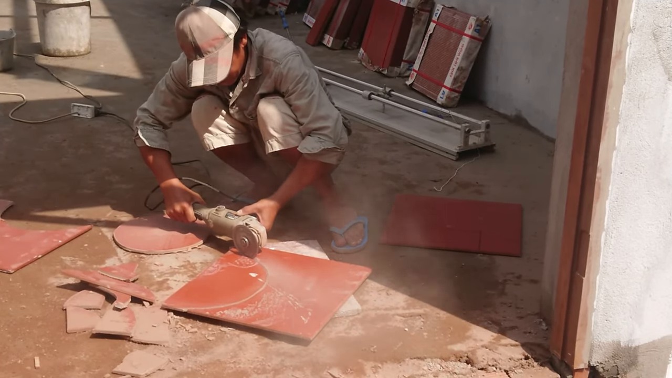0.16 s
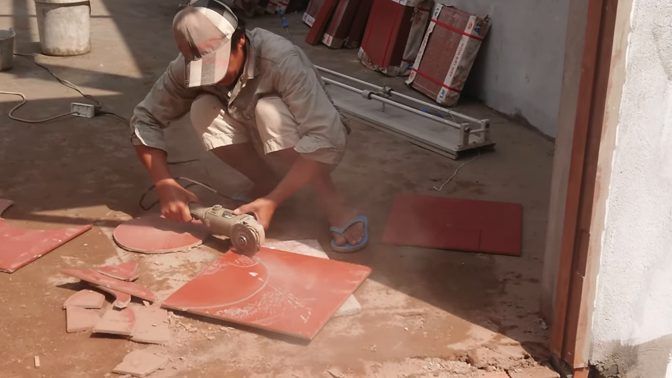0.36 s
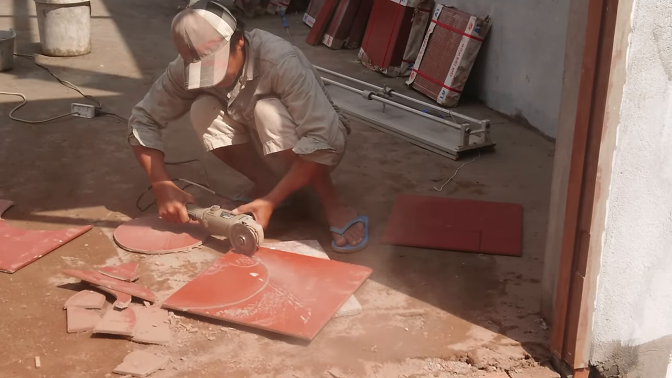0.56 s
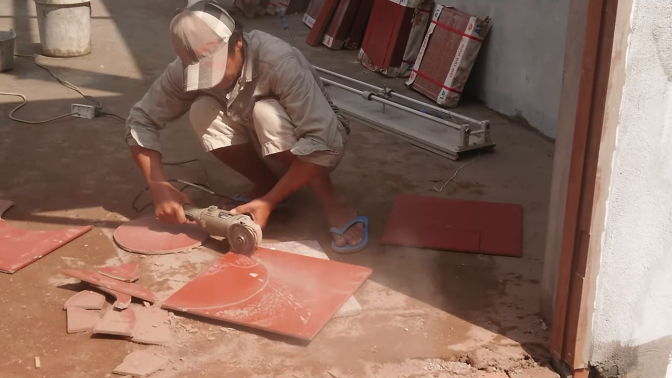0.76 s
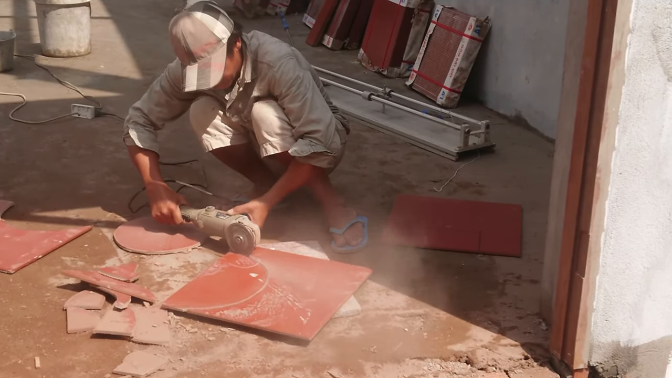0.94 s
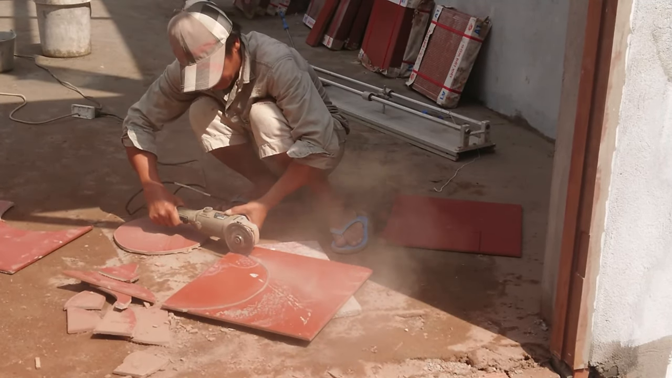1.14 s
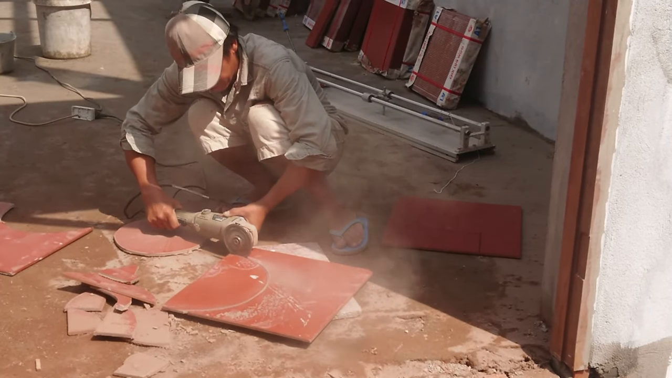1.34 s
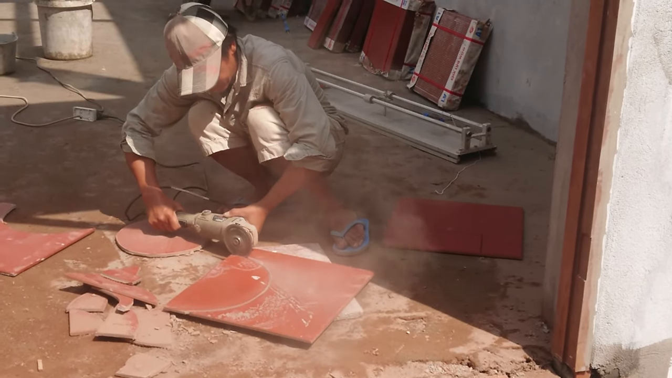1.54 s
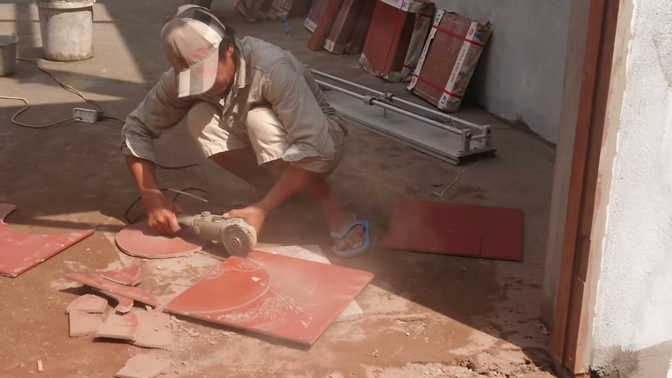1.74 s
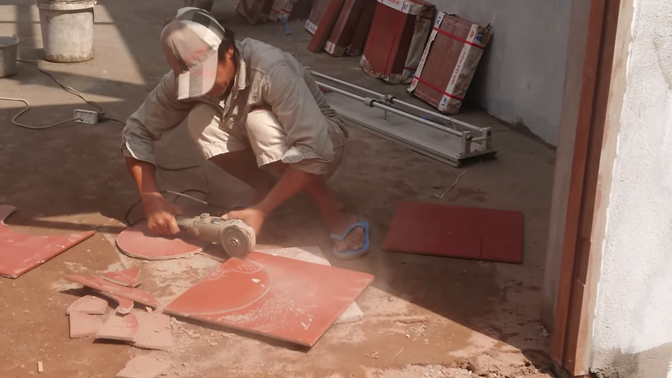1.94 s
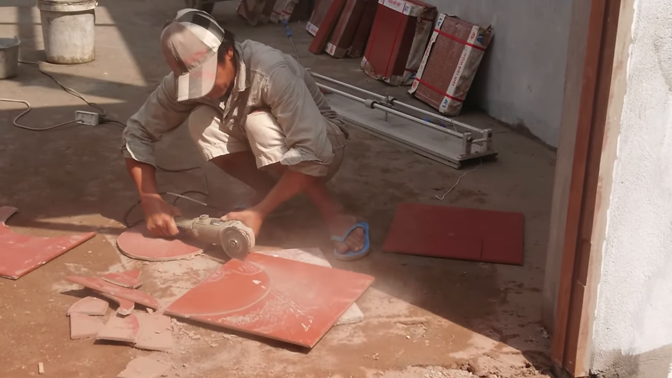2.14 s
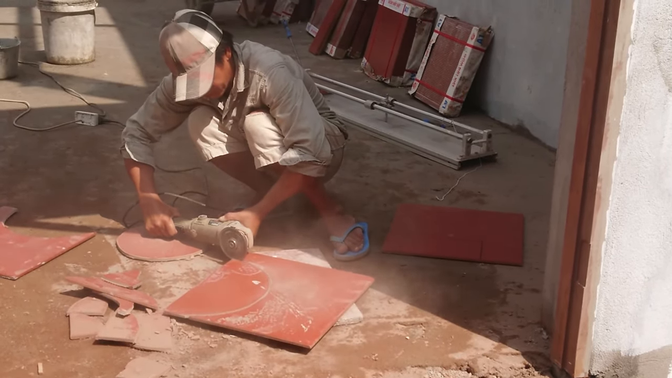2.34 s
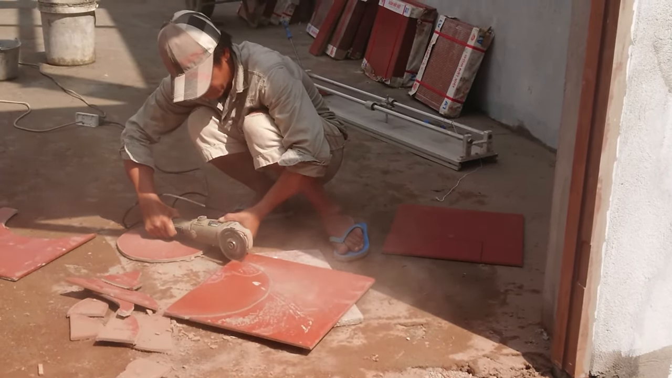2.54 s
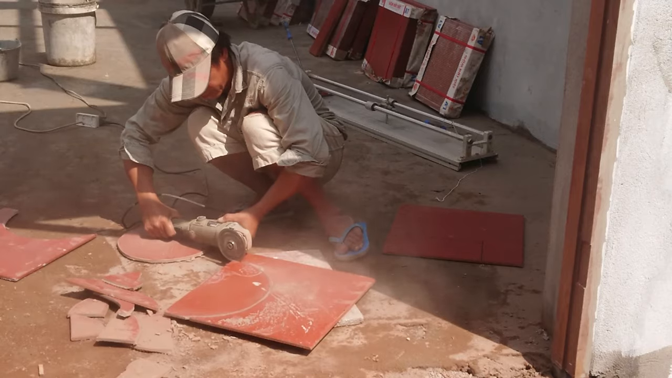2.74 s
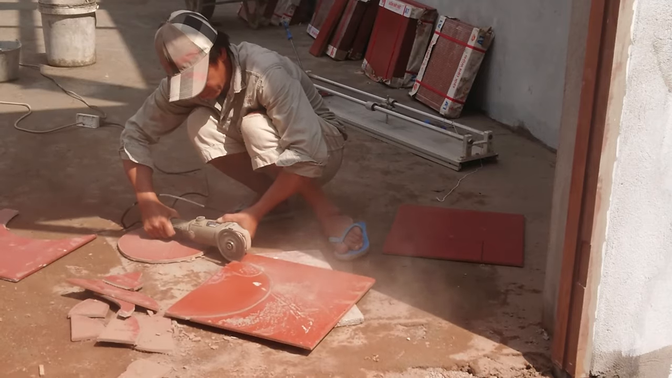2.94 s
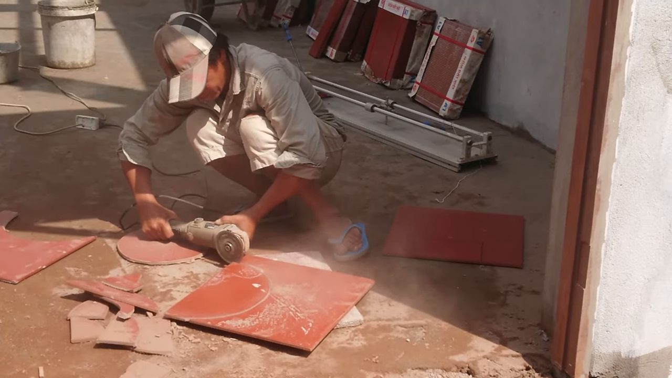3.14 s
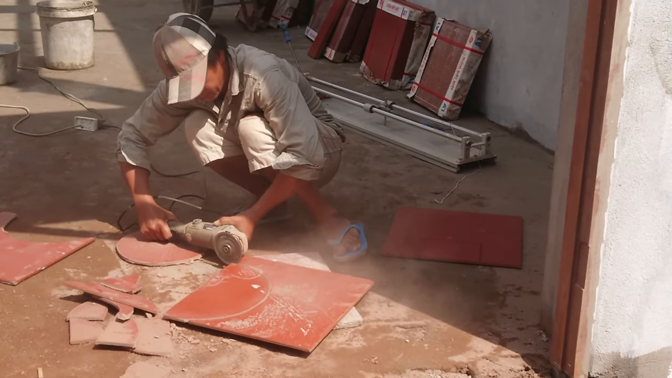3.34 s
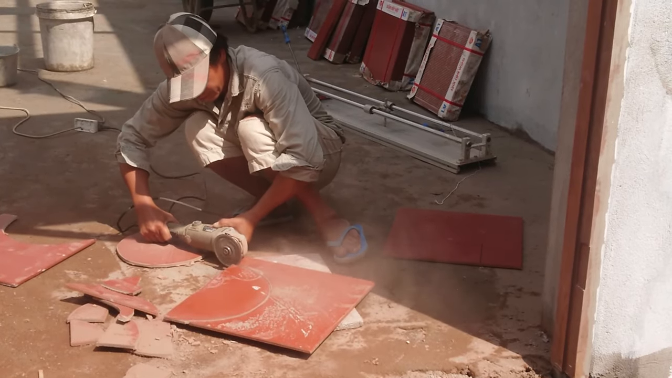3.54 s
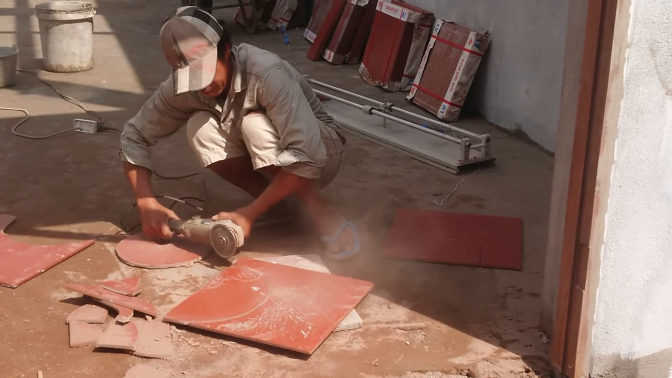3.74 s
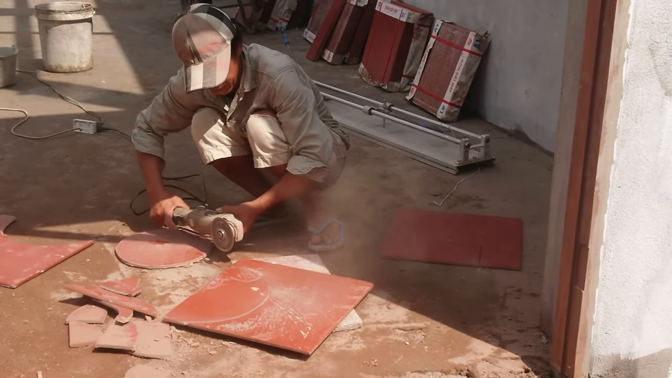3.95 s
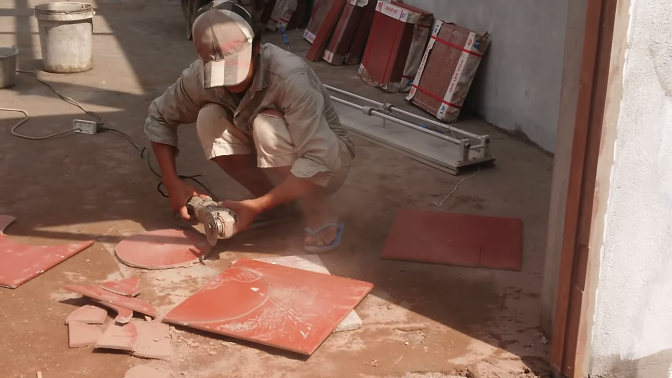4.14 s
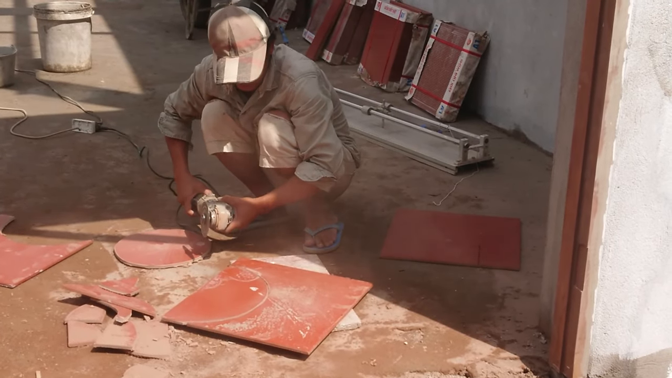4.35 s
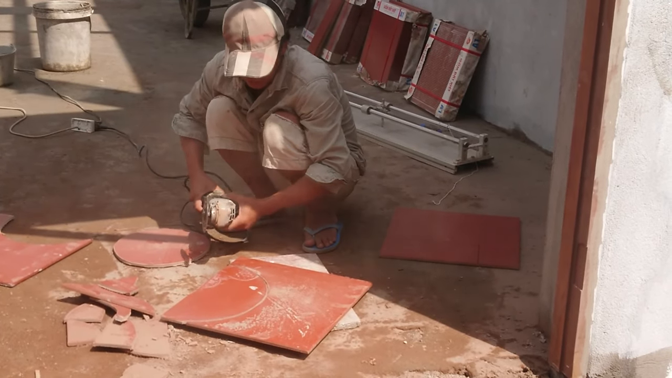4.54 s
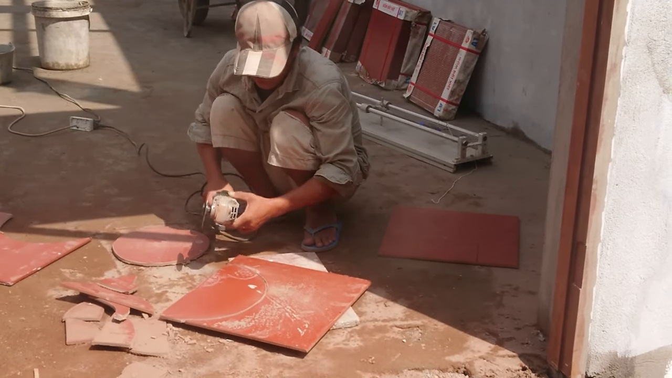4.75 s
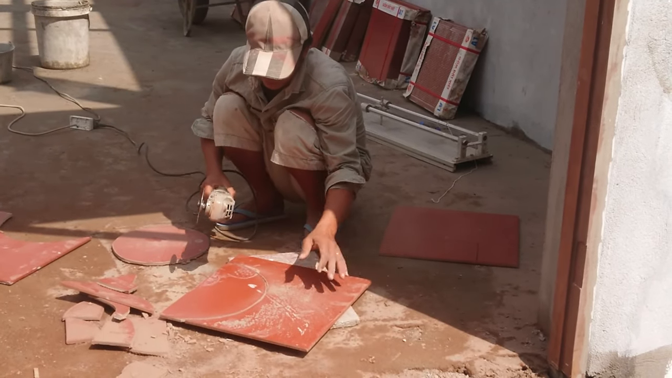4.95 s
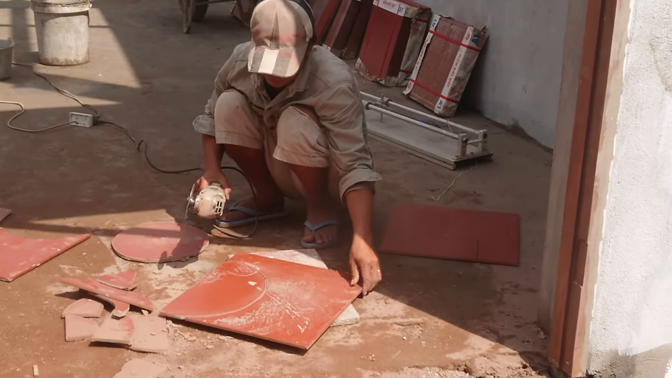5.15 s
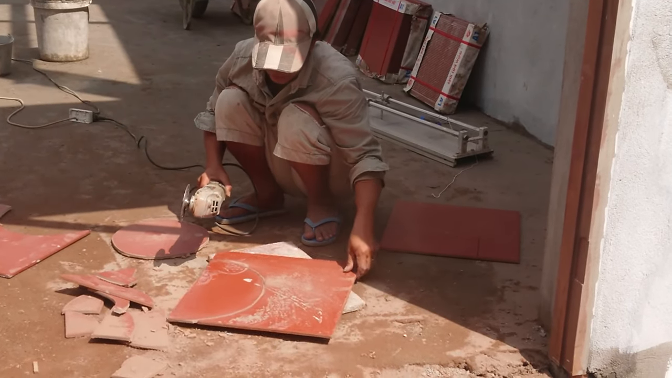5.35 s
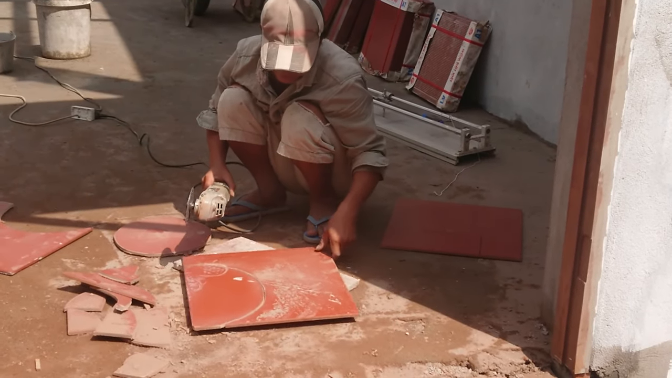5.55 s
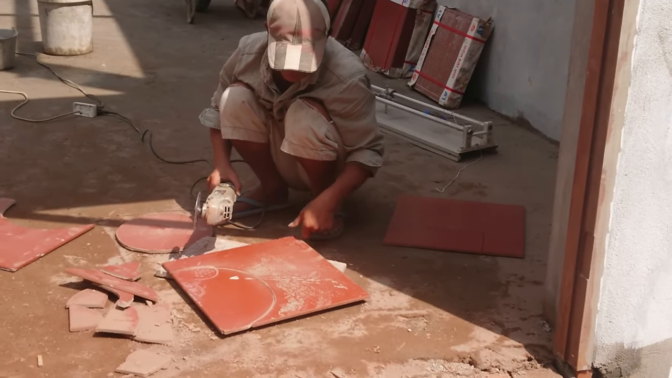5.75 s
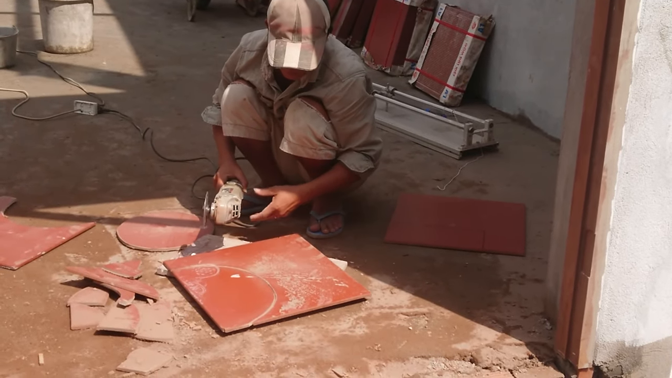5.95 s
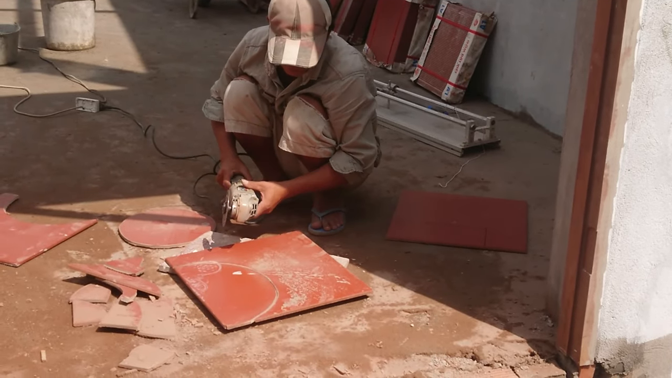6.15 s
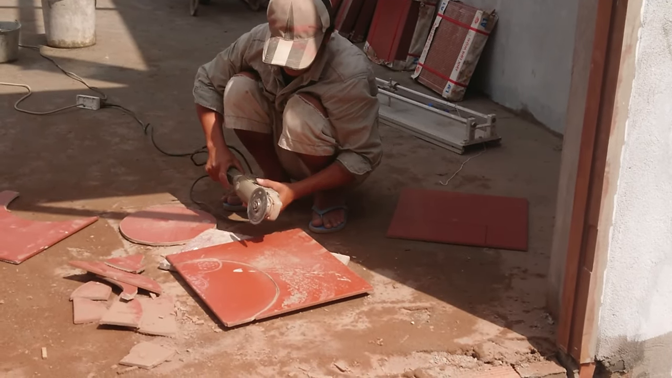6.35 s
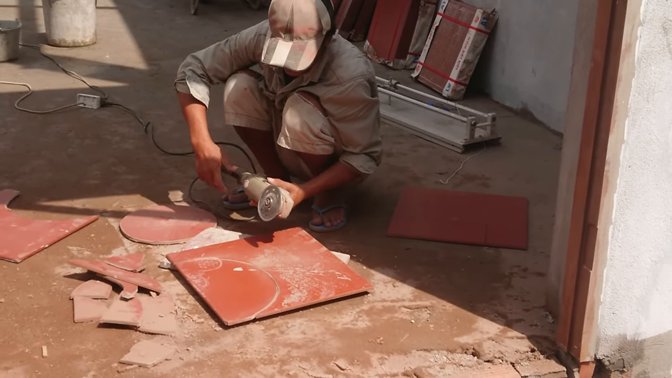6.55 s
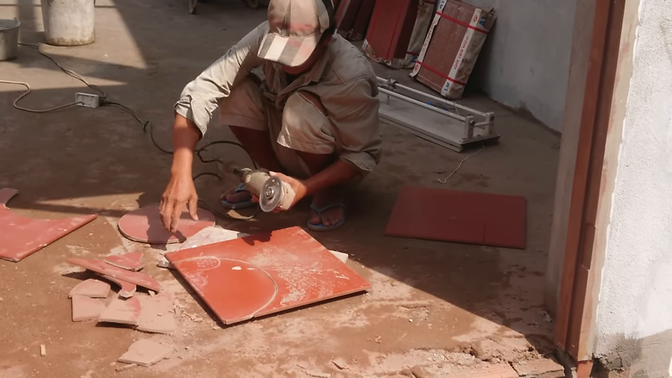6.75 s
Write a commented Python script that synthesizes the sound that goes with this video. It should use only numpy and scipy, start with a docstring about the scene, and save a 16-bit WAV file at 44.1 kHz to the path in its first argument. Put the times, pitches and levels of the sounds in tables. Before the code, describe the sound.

From the start, an angle grinder cuts a hard floor tile close by, making a loud, gritty, bright rasp with wavering, ringing tones. Its pitch sags slightly around 1 second, then climbs as the cut deepens, loudest between 2 and 3 seconds. At about 3.8 seconds the disc lifts away and the switch clicks sharply. The high motor whine glides steadily downward over a hissing rush of air, fading through the remaining three seconds. A soft, low outdoor rumble rises from about 4.5 seconds. Between 5.3 and 6 seconds the loose tile is turned on the floor, scraping and giving several short knocks, the strongest near 5.5. The slowing gears rattle faintly from then until the end, near 7 seconds, with a few thin metal ticks between 6 and 6.6. The sound is stereo, with short echoes off nearby walls.

```python
"""An angle grinder cuts a floor tile under a roof: the disc strikes once a turn and sheds grit, both ring tile
and disc, and the motor whines at a fixed multiple of the disc speed. Near 3.8 s the tool is lifted, the switch
clicks, and the whine glides down over a rush of air as the low rumble beneath grows louder. From 5.3 s the
slack gear rattles and the tile is turned, scraping and knocking; thin metal ticks come last. Two microphone
ports hear it all in unlike colours."""
import sys
import numpy as np
from scipy import signal
from scipy.fft import rfft, irfft, next_fast_len
from scipy.io import wavfile
from scipy.ndimage import uniform_filter1d

SR = 44100
rng = np.random.default_rng(int(sys.argv[2]) if len(sys.argv) > 2 else 0)


def store_wav(level_fs):
    """Save 16-bit WAV to argv[1]."""
    pcm = np.round(np.clip(np.atleast_2d(level_fs), -1, 1) * 32767)
    wavfile.write(sys.argv[1], SR, pcm.T.astype(np.int16))


N = 304290
T = np.arange(N) / SR

# The cut's moves, ending at the lift:
# (time [s], pressure [dB], treble lift [dB], weight of regular strikes [0-1], cut depth [0-1])
CUT_MOVES = [(0, -18.5, 6.5, 0.5, 0.15), (.23, -17.5, 3, 0.14, 0.2), (.62, -17.5, 7, 0.36, 0.46),
             (1, -17.5, 4.5, 0.46, 0.49), (2.16, -15, 2, 0.04, 0.83), (2.55, -15.5, 3.5, 0.41, 0.85),
             (3, -15, 3, 0.43, 0.88), (3.3, -18, 4.5, 0.4, 0.89), (3.67, -20, 8, 0.38, 0.81),
             (3.75, -29.5, 15.5, 1, .6), (3.785, -29, 8, 0, 0.5)]
# Resonances of tile and disc: (pitch [Hz])
BODY_HZ = [620, 820, 1045, 1250, 1325, 1465, 1600, 1750, 2130, 2215, 2300, 2630, 2940, 3050, 3380, 3615,
           4000, 4393, 4772, 5400, 6600, 7210, 8020, 9000, 10480, 11350, 13230, 13800, 15200]
# Shape of each resonance: (nominal width [Hz], level in a shallow cut [dB], in a deep cut [dB])
BODY_SHAPES = [(90, -33, -26), (74.5, -20.5, -23), (48, -23.5, -15.5), (49.4, -42, 3), (42, 3, -18),
               (45, -4.5, -33), (80, -36.5, -20), (109, -19, -10), (71.4, -8, 1), (65, -3, -6.5),
               (55, -9, -11), (75, -9, -5), (63, -3.5, -2), (96, -17.5, -1), (52, -33.5, -22), (38, -15, 0),
               (320, -8.5, -11.5), (40, -5.5, -3), (40, -16, 1), (48.6, -11.5, -9.5), (230, -9.5, -14),
               (72, -5, -19.5), (210, -7.5, -5), (345.6, -13.5, -11.5), (140, -18.5, -5.5), (110, -15, -16),
               (170, -4.5, -6), (360, -9, -9.5), (600, -12, -14)]
# Broad bed of grit under the resonances: (frequency [Hz], level [dB])
GRIT_EQ = [(30, -44), (150, -41), (500, -32), (1100, -22.5), (1400, -13.5), (2450, -16), (3200, -9.5),
           (5000, -16), (6000, -17.5), (6500, -11), (8500, -12), (11000, -19.5), (12600, -28), (14500, -17),
           (15300, -17), (15800, -19)]


def cut():
    """Strikes once a turn and gritty noise ring tile and disc; the colour shifts as the cut deepens."""
    pressure_db, _, regular, _ = columns(CUT_MOVES, T)
    turn = disc_turns()
    offsets = rng.random((40, 1)) + 0.14 * drift(3.886, count=40, t=T[::256])  # no two strikes alike
    strikes = sum(np.cos(2 * np.pi * (k * turn + np.interp(T, T[::256], offset)))
                  for k, offset in enumerate(offsets, 1))
    chatter_db = 0.86 * smooth_noise(samples=350) + 0.25 * np.cos(2 * np.pi * turn)
    grit = unit_rms(gritty_noise(spike_db=4.27))
    drive = (0.62 * regular * unit_rms(strikes) + np.sqrt(1 - regular ** 2) * grit) * gain_of(chatter_db)

    def body(hz, s):
        _, treble_db, _, depth = columns(CUT_MOVES, s)
        wander_db = 1.8 * drift(25, count=len(BODY_HZ), t=s)
        power = gain_of(2 * columns(GRIT_EQ, hz, log=True)[0])
        for mode_hz, (width, shallow_db, deep_db), wander in zip(BODY_HZ, BODY_SHAPES, wander_db):
            db = shallow_db + (deep_db - shallow_db) * depth + wander
            power = power + gain_of(2 * db) / (1 + (2 * (hz - mode_hz) / width) ** 2) ** 1.47
        return np.sqrt(power) * gain_of(treble_db * np.clip((hz - 5000) / 7000, 0, 1))
    lift_fade = np.clip((CUT_MOVES[-1][0] - T) / .012, 0, 1)
    return gain_of(pressure_db) * lift_fade * unit_rms(coloured(drive, body, size=2048))


# Sharp modes that sing in the cut: (pitch [Hz])
SING_HZ = [322, 612, 810, 985, 1060, 1245, 1325, 1470, 1560, 1720, 2130, 2205, 2300, 2635, 2940, 3050, 3122,
           3612, 3945, 4393, 4772, 8030]
# Each sharp mode at full pressure: (width [Hz], early level [dB], midway level [dB], late level [dB])
SING_SHAPES = [(11.2, -68, -63, -63.5), (37.2, -55, -55, -51), (40.3, -33, -49, -51.5),
               (19.2, -65, -63, -54), (83.333, -52.5, -55.5, -55), (54, -41, -41.5, -45),
               (42.5, -28, -42.5, -46.5), (44.7, -32.5, -52, -62), (74.074, -40, -43, -51),
               (63, -56, -46, -31.5), (34.4, -47, -40, -36.5), (32.407, -36, -32, -67),
               (18.519, -54, -44, -38), (40, -52, -49, -50), (27, -34, -47, -50), (31.8, -52, -33, -26),
               (20, -64, -50, -40), (50, -85, -48, -28), (25, -67, -58, -43), (25, -45, -37, -40),
               (25, -52, -41, -42), (40, -32, -44, -36)]
# Early, midway and late keyframes: (time [s])
SING_KEYFRAMES = [.7, 1.9, 3]


def singing():
    """Wavering harmonics of the disc speed, each swelling while it sits on a sharp mode."""
    full_pressure_db, bite = -17, 2.2  # the singing follows the pressure, more than in step
    turn, disc_hz, t = disc_turns(), disc_speed()[::64], T[::64]
    bite_db = bite * (columns(CUT_MOVES, t)[0] - full_pressure_db)
    bite_db[t >= CUT_MOVES[-1][0]] = -np.inf
    power = np.array([gain_of(2 * (np.interp(t, SING_KEYFRAMES, db) + bite_db))
                      for _, *db in SING_SHAPES])
    mode_hz, width = np.c_[SING_HZ], np.array(SING_SHAPES)[:, :1]
    out = np.zeros(N)
    for k, waver in enumerate(drift(25, count=55, t=t), 1):
        detuning = 2 * (k * disc_hz - mode_hz) / width
        level = np.sqrt((power / (1 + detuning ** 4)).sum(0)) * gain_of(2 * waver)
        out += np.interp(T, t, level) * np.sin(2 * np.pi * k * turn + 0.45 * np.interp(T, t, waver))
    return np.sqrt(2) * out


# The disc sagging under load, ending at switch-off: (time [s], speed [turns/s])
POWERED_SPEED = [(0, 154.7), (.3, 151), (.6, 147.2), (1, 146.5), (1.2, 147.2), (1.65, 152.4), (2.5, 159.6),
                 (2.75, 163), (3.05, 164.5), (3.6, 163.9), (3.79, 166.2)]


def disc_speed():
    """Turns per second: the motor pulls, then bearing friction and fan drag wind the disc down."""
    friction, fan_drag = 21.35, .002398  # slowing [Hz/s] = friction + fan_drag * speed ** 2
    off_s, off_hz = POWERED_SPEED[-1]
    even_hz = np.sqrt(friction / fan_drag)  # friction and drag are equal here
    run_down = np.sqrt(friction * fan_drag) * np.maximum(T - off_s, 0)
    coast = even_hz * np.tan(np.arctan(off_hz / even_hz) - run_down)
    return np.where(T < off_s, columns(POWERED_SPEED, T)[0], coast)


def disc_turns():
    """Turns so far: the clock for everything that spins."""
    return np.cumsum(disc_speed()) / SR


# How housing and floor colour the whine: (frequency [Hz], level [dB])
WHINE_EQ = [(2700, -66), (3200, -58), (3400, -53), (3800, -46), (3990, -46), (4250, -41), (4680, -37),
            (4850, -40), (5140, -37), (5680, -47), (6040, -35), (6600, -21), (7110, -35), (7450, -24),
            (7830, -33), (8100, -26), (8400, -36), (8720, -25), (9150, -34), (9400, -28), (10300, -28),
            (11400, -32), (12900, -38), (13800, -24), (15700, -30)]


def whine():
    """The commutator bars sing a tone and its octave, which sweep down as the disc coasts."""
    bars_per_turn = 55.6
    disc_hz, turn = disc_speed(), disc_turns()
    loaded_db = -35 - 3 * np.maximum(155 - disc_hz, 0)  # sinks as the speed sags
    coast_db, octave_db = (columns(WHINE_EQ, k * bars_per_turn * disc_hz, log=True)[0] for k in (1, 2))
    crossfade = np.clip((T - POWERED_SPEED[-1][0]) / 0.098, 0, 1)
    tone_db = loaded_db + crossfade * (coast_db - loaded_db)
    octave_db = octave_db - 14 - 1.6 * np.maximum(64 - disc_hz, 0)  # dies below 64 turns/s
    phase = 2 * np.pi * bars_per_turn * turn
    flutter = gain_of(1.5 * np.cos(2 * np.pi * turn) + 2.2 * drift(40, count=1, t=T)[0])
    tones = gain_of(tone_db) * np.sin(phase) + gain_of(octave_db) * np.sin(2 * phase)
    return np.sqrt(2) * flutter * tones


# Fader ride of cooling air and gears: (time [s], level [dB], treble tilt [dB/octave])
AIR_MOVES = [(0, -44, -2.5), (3.7, -27, 1.5), (3.85, -25.5, -1), (4.4, -26.5, -2), (5, -31, -2),
             (5.7, -32.5, -3.5), (6.1, -42.5, -0.5), (6.9, -47.5, -0.5)]
# Colour of that rush: (frequency [Hz], level [dB])
AIR_EQ = [(300, -20), (700, -9), (1150, -7), (1450, 1.5), (1900, -7.5), (3000, 2.5), (5200, 5),
          (5800, -5.5), (6500, 12), (8000, 7), (10000, 2.5), (12300, -8), (13300, 1), (13900, 3),
          (14400, -3), (15800, 3)]


def air_rush():
    """Cooling air and gears make a bright noise that shimmers in random patches."""
    def colour(hz, s):
        patches = rng.standard_normal((len(hz), len(s)))
        patches = uniform_filter1d(uniform_filter1d(patches, 12, axis=0), 10, axis=1)
        tilt_db = columns(AIR_MOVES, s)[1] * np.log2((hz + 100) / 3000)
        return gain_of(columns(AIR_EQ, hz, log=True)[0] + tilt_db + 1.46 * unit_rms(patches))
    return gain_of(columns(AIR_MOVES, T)[0]) * unit_rms(coloured(rng.standard_normal(N), colour))


# Ride of the gear rattle: (time [s], level [dB], ring pitch [Hz])
RATTLE_MOVES = [(5.3, -54, 2140), (5.8, -42.5, 2150), (6, -42, 2120), (6.1, -49, 2070), (6.25, -42.5, 1960),
                (6.45, -54, 2000), (6.5, -73, 3200), (6.56, -44, 3050), (6.9, -54, 3120)]


def gear_rattle():
    """The slack gear knocks once a turn: a short rough ping, each with its own force."""
    turn = disc_turns()
    level_db, ring_hz = columns(RATTLE_MOVES, T)
    force = gain_of(2.4 * rng.standard_normal(2000))[turn.astype(int)]
    since_s = turn % 1 / disc_speed()
    roughness = 1 + .55 * smooth_noise(samples=60)
    pings = np.sin(2 * np.pi * ring_hz * since_s) * since_s * np.exp(-since_s / 0.0016)
    return gain_of(level_db) * unit_rms(force * roughness * pings)


def motor_hum():
    """A faint hum at twice the disc speed, gone below 140 turns per second."""
    level = gain_of(-64.5 + 2 * drift(6, count=1, t=T)[0])
    gate = np.clip((disc_speed() - 140) / 5, 0, 1)
    return np.sqrt(2) * level * gate * np.sin(4 * np.pi * disc_turns())


# Ring of the loose tile: (pitch [Hz], level [dB], t60 before damping [s])
TILE_MODES = [(580, 1, 0.099), (766, 7, .05), (1120, -7, .05), (1270, 18.5, 0.034), (1510, 12, 0.061),
              (1890, 8, 0.069), (2090, 15, 0.017), (2200, -6, .05), (2730, -2, 0.031), (4470, -14, .03)]
# The sliding tile catches: (time [s], level [dB], half-length [s])
TILE_SCUFFS = [(5.433, -35, 0.012), (5.507, -43, .015), (5.544, -36, 0.0066), (5.587, -45, 0.025),
               (5.696, -42, 0.013), (5.78, -32, 0.0087)]
# Its edge hits the floor: (time [s], peak [dB])
TILE_KNOCKS = [(5.416, -28), (5.4824, -31), (5.5429, -16), (5.5486, -19), (5.6373, -25), (5.6918, -24.5),
               (5.8292, -34)]


def turned_tile():
    """Grit scrapes under the loose tile and its edge knocks on the floor; both ring the same modes."""
    drag_from_s, drag_to_s, fade_s, drag_db = 5.3, 5.95, 0.14, -45.5
    t = np.arange(4000) / SR
    ring = sum(gain_of(db - 60 * t / t60) * np.sin(2 * np.pi * hz * t) for hz, db, t60 in TILE_MODES)
    slide_ring = np.diff(ring * np.exp(-t / 0.0014))  # the floor deadens the sliding tile
    knock_ring = ring * (1 - np.exp(-t / 0.00052)) * np.exp(-t / 0.005)
    drag = gain_of(drag_db) * np.clip(np.minimum(T - drag_from_s, drag_to_s - T) / fade_s, 0, 1)
    scuffs = sum(gain_of(db) * np.exp(-((T - s) / half_s) ** 2) for s, db, half_s in TILE_SCUFFS)
    out = (drag + scuffs) * unit_rms(signal.oaconvolve(gritty_noise(spike_db=4.2), slide_ring)[:N])
    for s, peak_db in TILE_KNOCKS:
        contact = np.diff(rng.standard_normal(41) * np.hanning(41))
        knock = signal.oaconvolve(contact, knock_ring)[:len(t)]
        out[round(s * SR):][:len(t)] += gain_of(peak_db) * knock / abs(knock).max()
    return out


# Cue for the switch: (time [s], peak [dB])
SWITCH_CUES = [(3.7665, -11)]


def switch_click():
    """The plastic switch snaps: a tiny burst of bright noise."""
    out, t = np.zeros(N), np.arange(300) / SR
    for s, peak_db in SWITCH_CUES:
        click = np.diff(rng.standard_normal(len(t) + 2), 2) * np.exp(-t / .001)
        out[round(s * SR):][:len(t)] += gain_of(peak_db) * click / abs(click).max()
    return out


# Thin ticks as the tool is handled: (time [s], peak [dB], pitch [Hz])
TICK_CUES = [(5.9752, -32, 10000), (6.0096, -28, 9830), (6.0425, -38, 8230), (6.1528, -37, 8310),
             (6.2445, -31, 9110), (6.3683, -35, 9990), (6.429, -23, 8950), (6.6367, -33, 8800)]


def metal_ticks():
    """Tiny metal parts touch and ring for a few milliseconds."""
    out, t = np.zeros(N), np.arange(800) / SR
    for s, peak_db, hz in TICK_CUES:
        out[round(s * SR):][:len(t)] += gain_of(peak_db) * np.sin(2 * np.pi * hz * t) * np.exp(-t / .0012)
    return out


# Fader ride of the outdoor bed, rising once the grinder is quiet: (time [s], level [dB])
RUMBLE_FADER = [(0, -68), (3.8, -55.5), (4.2, -55), (4.6, -46.5), (5.5, -43), (6.9, -42)]
# Its heavy lows and faint hiss: (frequency [Hz], level [dB])
RUMBLE_EQ = [(25, -40), (34, -30), (42, -3), (75, 4), (130, -4), (250, -8), (500, -7), (900, -5),
             (1200, -12.5), (2500, -6), (5400, -10), (6000, -27), (6500, -37), (8800, -8.5), (11000, -20.5),
             (13300, -16), (14500, -8.5), (15800, -19.5)]


def outdoor_rumble():
    """A stereo bed of low noise from outside, mostly alike on both sides."""
    def colour(hz, s):
        return gain_of(columns(RUMBLE_EQ, hz, log=True)[0])
    alike = 0.9
    common, *sides = rng.standard_normal((3, N))
    bed = [coloured(alike * common + np.sqrt(1 - alike ** 2) * side, colour, size=4096) for side in sides]
    return gain_of(columns(RUMBLE_FADER, T)[0]) * unit_rms(np.array(bed))


def wall_echoes(t60):
    """Reverb tail off the walls: sparse taps of random sign that die away, energy 1."""
    taps = np.zeros(SR // 2)
    at = np.arange(200, len(taps) - 20, 20)
    taps[at + rng.integers(0, 20, len(at))] = rng.choice([-1., 1.], len(at)) * gain_of(-60 * at / SR / t60)
    return taps / np.linalg.norm(taps)


def gain_of(db):
    """Decibels to gain."""
    return 10 ** (np.asarray(db) / 20)


def unit_rms(x):
    """Scales to rms 1."""
    return x / np.sqrt(np.mean(x ** 2) + 1e-20)


def columns(rows, at, log=False):
    """Reads a table as breakpoint curves over its first column."""
    axis, *curves = np.transpose(rows)
    if log:
        axis, at = np.log(axis), np.log(at + 1)
    return [np.interp(at, axis, curve) for curve in curves]


def drift(top_hz, count, t):
    """Slow random modulation curves of rms 1."""
    hz = np.geomspace(top_hz / 10, top_hz, num=16)[:, None]
    phases = rng.random((count, 16, 1))
    return unit_rms((np.sin(2 * np.pi * (hz * t + phases)) / np.sqrt(hz)).sum(1))


def smooth_noise(samples):
    """Noise under a moving average, rms 1."""
    return unit_rms(uniform_filter1d(rng.standard_normal(N), samples))


def gritty_noise(spike_db):
    """White noise with random spikes in level."""
    return rng.standard_normal(N) * gain_of(spike_db * np.minimum(rng.exponential(1, N), 4))


def coloured(x, gain, size=1024):
    """A moving EQ: filters x by gain(hz, s)."""
    frames = dict(fs=SR, nperseg=size, noverlap=size * 3 // 4)
    hz, s, spectrum = signal.stft(x, **frames)
    return signal.istft(spectrum * gain(hz[:, None], s), **frames)[1][:len(x)]


# Stereo image at the ports: (frequency [Hz], left gain [dB], left lag [rad], left direct weight [0-1])
STEREO_IMAGE = [(40, 3, 0, .8), (200, 6, 0, .9), (400, 8, 0, .9), (800, 0, .3, .85), (1400, 0, 0, .9),
                (2200, 1, .35, .9), (2900, -5, .5, .6), (3600, -10, -1.5, .5), (4700, -5, -1.2, .6),
                (5600, -7, -1.3, .5), (6100, -20, -1.5, .4), (6500, -33, -2, .4), (6950, -30, -3.3, .4),
                (7500, -16, -3.8, .6), (8000, -12, -3.6, .75), (8500, -16, -3.5, .5), (9300, -11, -4.3, .5),
                (10500, -8, -5.3, .6), (11500, -7, -5.9, .5), (12500, -2, -6.5, .75), (13300, -3, -7, .8),
                (13800, 2, -6.8, .85), (14500, 1, -7, .75), (15200, 5, -7.4, .8), (15700, 11, -7.8, .75)]


def scene():
    """The mix: the right port faces the work; the shaded left port hears more of the walls."""
    size = next_fast_len(N + SR)
    grinder = cut() + singing() + whine() + air_rush() + gear_rattle() + motor_hum()
    work = rfft(grinder + turned_tile() + switch_click() + metal_ticks(), size)
    outside = rfft(outdoor_rumble(), size)
    left_db, lag, direct = columns(STEREO_IMAGE, np.fft.rfftfreq(size, 1 / SR), log=True)
    left = work * (direct + np.sqrt(1 - direct ** 2) * rfft(wall_echoes(t60=0.47), size)) + outside[0]
    right = work * (1 + gain_of(-7) * rfft(wall_echoes(t60=.25), size)) + outside[1]
    left *= gain_of(left_db) * np.exp(-1j * lag)
    return irfft(np.array([left, right]), size)[:, :N]


def record(dry):
    """Master chain: a soft clip rounds the highest peaks, then a steep low-pass trims the top."""
    ceiling, cutoff_hz = .95, 15810
    rounded = ceiling * np.tanh(dry / ceiling)
    low_pass = signal.firwin(1023, cutoff_hz, window=("kaiser", 9), fs=SR)
    return signal.oaconvolve(rounded, low_pass[None], "same")


dry = scene()
out = record(dry)
store_wav(out)
```